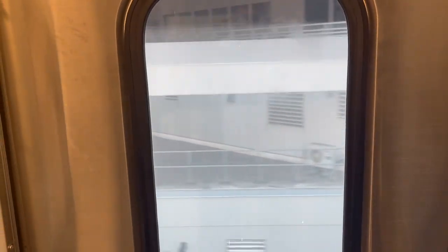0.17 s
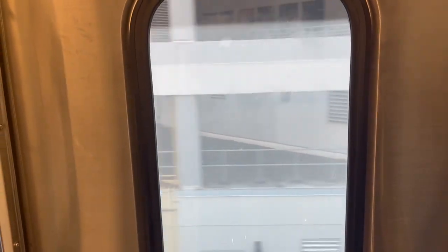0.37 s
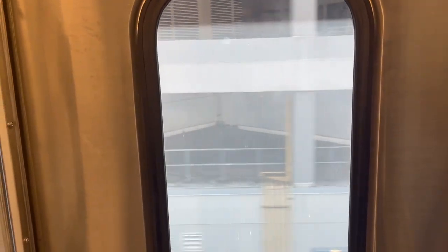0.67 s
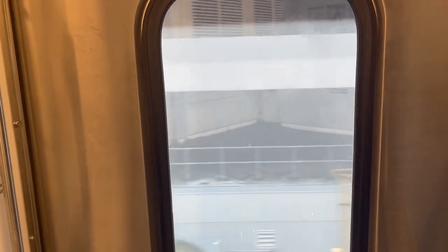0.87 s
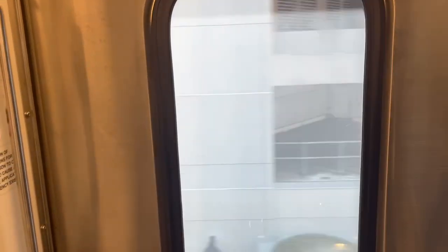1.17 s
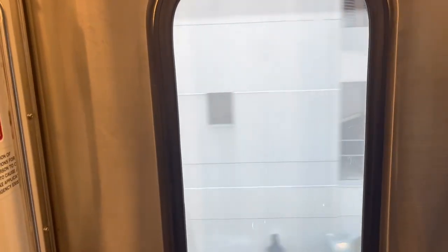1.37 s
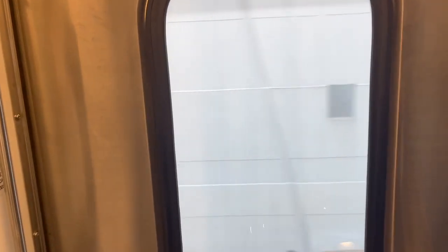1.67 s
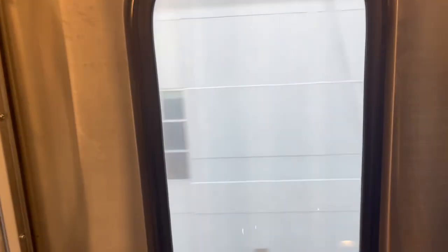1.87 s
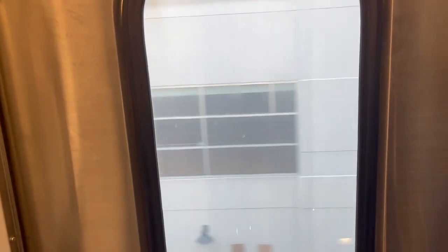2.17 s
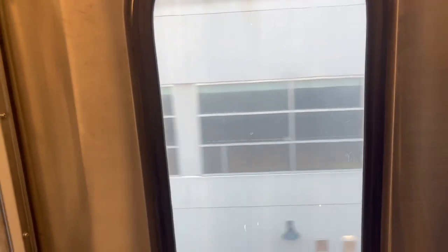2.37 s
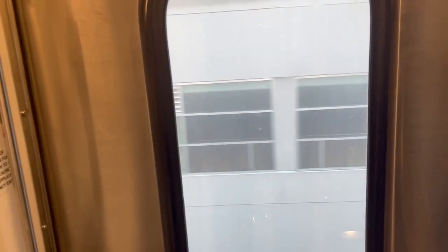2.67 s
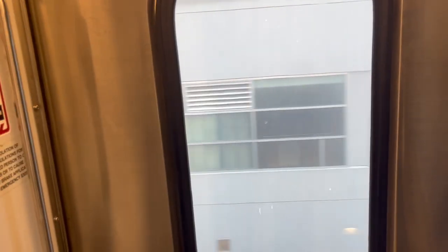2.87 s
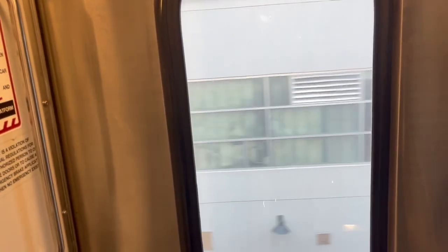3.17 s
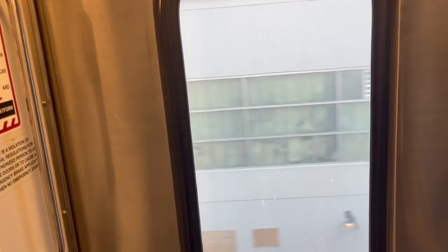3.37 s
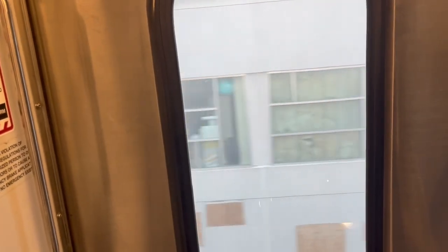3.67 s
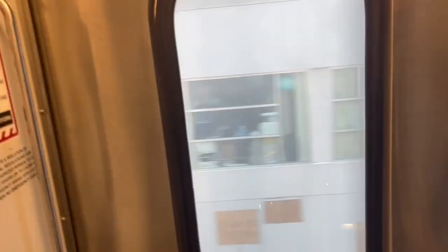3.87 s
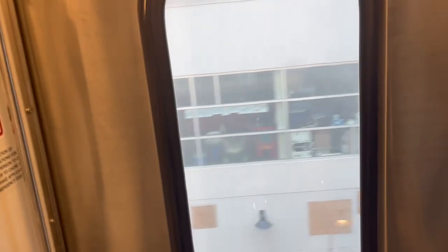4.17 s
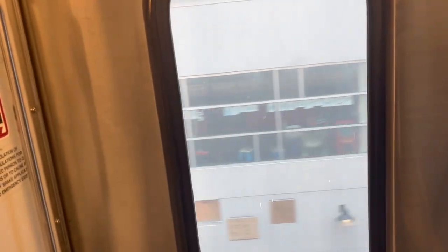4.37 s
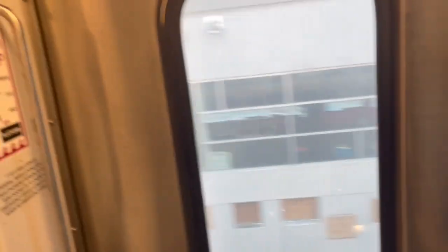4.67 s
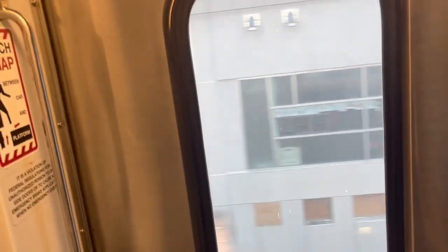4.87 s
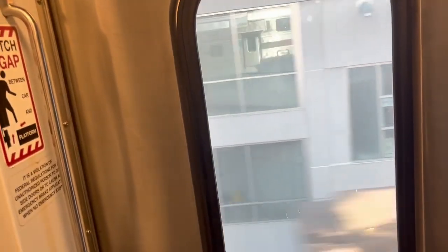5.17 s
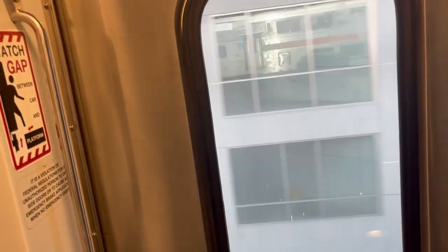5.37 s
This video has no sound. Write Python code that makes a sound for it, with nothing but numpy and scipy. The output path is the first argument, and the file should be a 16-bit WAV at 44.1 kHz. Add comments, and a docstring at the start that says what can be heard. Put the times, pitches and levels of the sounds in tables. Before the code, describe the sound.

Inside a rolling train coach, a burst of rushing air fades into low rumble, with dull rail knocks, a brief squeak and light ticks.

```python
"""Inside the vestibule of a slowly rolling train coach: the floor booms, the body drones and wheels roar as
shaped noise; a transformer, fans and drive train hum as unsteady tones and one narrow band of noise. A rush of
air, noise that rings door and walls, dies away at the start; draught fizzes in gusts at the door seal. Rail
joints knock, the body drone swells once, a loose panel ticks and two puffs of air hiss, all as decaying bands
of noise; a rubber seal squeaks in short slips of tone and friction noise. Two close microphone ports hear it."""
import sys
import numpy as np
from scipy import signal
from scipy.fft import rfft, irfft, next_fast_len
from scipy.io import wavfile
from scipy.ndimage import uniform_filter1d, map_coordinates

SR = 44100
rng = np.random.default_rng(int(sys.argv[2]) if len(sys.argv) > 2 else 0)


def undo_db(level):
    """Turn decibels back into plain size, where 20 dB means ten times bigger."""
    steps = np.asarray(level, float) / 20
    return 10 ** steps


def int16_out(signal):
    """Quantize to a 16-bit WAV file."""
    q = np.round(np.clip(np.atleast_2d(signal).T, -1, 1) * 32767)
    wavfile.write(sys.argv[1], SR, q.astype(np.int16))


N = 242991  # length in samples

# Likeness of the two ports. Each row: frequency in Hz, left-right correlation from 0 to 1.
PORT_LIKENESS = [(30, 0.98), (100, 1), (220, 0.66), (350, 0.92), (700, 0.28), (1300, 0.14), (1900, 0.33),
                 (3000, 0.56), (4500, 0.27), (6000, 0.23), (8000, 1), (12000, 0.86)]
# Phase between the ports. Each row: frequency in Hz, lead of the left port in radians.
PORT_LEAD = [(50, 0), (700, .6), (1100, .4), (1450, -2.7), (1700, -5.8), (3200, -5.3), (5000, -6.3),
             (6500, -7.3), (8300, -9.4), (9700, -10.6), (11200, -12.5), (12800, -12.7), (14200, -15.5)]
# Level between the ports. Each row: frequency in Hz, left over right in dB.
PORT_TILT = [(60, 0), (180, 0), (530, 1.5), (1560, 0), (4630, 3), (13700, -2.5)]

# Strength of the rolling over its mean. Each row: time in seconds, level in dB.
ROLLING_STRENGTH = [(0, 0.5), (.6, -1), (1.0, 1.5), (1.6, -1.5), (2.1, 1.5), (2.8, -.5), (3.7, 0),
                    (4.4, -0.5), (5.0, 0), (5.51, 0)]
# Level of the floor's boom. Each row: time in seconds, level in dB.
BOOM_LEVEL = [(0, -21), (.5, -24.5), (1.1, -20.5), (1.5, -24), (2.05, -22.5), (2.7, -23.5), (3.6, -24),
              (4.0, -24), (4.4, -23.5), (4.9, -25), (5.51, -22.5)]
# Noise spectra of boom, drone and roar. Each row: frequency in Hz, relative density in dB per Hz.
BOOM_SPECTRUM = [(10, -49), (18, -22.5), (30, -18.5), (38, -17), (45, -7), (52, -0.5), (62, -3), (73, 0),
                 (90, -1), (110, 0), (122, 2.5), (135, -8), (170, -16), (220, -50.5), (370, -120)]
DRONE_SPECTRUM = [(76, -41.5), (130, -7), (167, -8.5), (199, -8), (291, -7.5), (360, -13), (391, -9.5),
                  (416, -10.5), (800, -24.5), (1040, -57.5), (1760, -120)]
ROAR_SPECTRUM = [(400, -16), (650, -5), (960, -1.5), (1100, -2.5), (1450, -4.5), (1650, -8.5), (1900, -7),
                 (2200, -11.5), (3200, -15.5), (4300, -18), (5500, -22.5), (7000, -34), (9000, -46.5),
                 (15400, -120)]
# Modes of the floor, and of the coach body. Each row: frequency in Hz, width in Hz,
# level over the noise itself in dB.
FLOOR_MODES = [(69.5, 4.5, -2), (78, 4, 0.5), (99.8, 7.6, -3.5), (118.6, 5.4, 1.5)]
BODY_MODES = [(226.7, 6.6, -6), (265.3, 6, 7), (290.4, 7.8, 0), (324.6, 3, 9), (348, 6, 1)]
DRONE_DB, ROAR_DB = -32, -40.5  # mean levels
DRONE_FOLLOWS, ROAR_FOLLOWS = 1.9, 0.57  # dB per dB of rolling strength

# Steady hums. Each row: pitch in Hz, level in dB, width in Hz, phase wander in radians.
STEADY_HUMS = [(28.3, -44.5, 1.1, 1.3), (59.2, -29.5, 2.4, .25), (557.4, -52, 30, 1.5),
               (1703, -72, 17, 1.4), (1804, -62, 20, 1.4), (1928, -59, 26, 1.4), (1972, -59.5, 26, 1.4),
               (2055, -62.5, 32, 1.6), (3040, -70, 22, 1.4)]
# Random wander of a hum's level. Each row: pitch in Hz, depth in dB.
HUM_WANDER = [(60, -0.2), (400, 2.5), (2000, 3)]
# Swelling and fading of a hum, about four random knots a second. Each row: pitch in Hz, depth in dB.
HUM_SWELL = [(60, 1.6), (400, 0.4), (1700, 2.6)]
# Levels of the low fan hum, the high fan hum and the drive-train tone. Each row: time in seconds, level in dB.
FAN_LEVEL = [(0, -51), (1.1, -43.5), (1.7, -43.5), (2.1, -48.5), (2.5, -44), (3.2, -40.5), (3.7, -44),
             (4.4, -45), (5, -41.5), (5.51, -48)]
WHINE_LEVEL = [(0.6, -56), (1.4, -49), (2.4, -61), (3.1, -46.5), (3.5, -51), (4.4, -52.5), (4.65, -47.5),
               (4.85, -53), (5.15, -46), (5.51, -51)]
DRIVE_LEVEL = [(0, -45.5), (1.2, -44.5), (2.0, -45), (2.7, -42), (3.3, -48), (4.0, -38), (4.6, -47.5),
               (5.05, -38), (5.51, -43.5)]
FAN_HZ, FAN_WIDTH_HZ, FAN_RAD = 390.5, 3, .35  # low fan hum: pitch, width, phase wander
WHINE_HZ, WHINE_WIDTH_HZ = 965.3, 25  # high fan hum
DRIVE_HZ, SAG_HZ_PER_S = 206.5, 5.1  # pitch at the start, fall as the train slows

# Draught at the door seal. Each row: frequency in Hz, relative density in dB per Hz.
DRAUGHT_SPECTRUM = [(3000, -30), (5000, 3), (6500, 8.5), (8000, 2.5), (10000, 5), (12000, -0.5),
                    (13500, -2), (14500, -10.5), (15300, -120)]
# Strongest gusts. Each row: peak time in seconds, peak level in dB, length between 6 dB points in seconds.
GUSTS = [(0.345, -72, 0.029), (0.679, -67, 0.044), (0.943, -71.5, 0.25), (1.286, -73.5, 0.082),
         (1.419, -64.5, 0.035), (1.693, -67, 0.051), (2.122, -70, 0.027), (2.266, -65, 0.11),
         (2.642, -69, 0.089), (3.726, -66, 0.071), (4.622, -74, 0.073), (5.066, -70.5, 0.17)]
DRAUGHT_DB, DRAUGHT_UNDER_RUSH_DB = -67, 34.5  # resting level, further part that follows the rush

# Panel ticks, and at 0.775 s and 0.818 s two puffs of air. Each row: start in seconds, level in dB, # centre in
# Hz, spread in octaves, time to fall 60 dB in seconds.
TICKS_AND_PUFFS = [(.775, -51, 12800, .12, .04), (.818, -51.5, 13100, 0.13, 0.049),
                   (3.17, -54, 11100, 0.26, 0.023), (4.8878, -33, 4280, 0.2, .008),
                   (4.9175, -31, 6600, 0.13, 0.0075), (4.92, -40.5, 5800, 0.15, .02),
                   (4.9795, -35, 3870, .3, 0.013), (5.09, -45, 4200, 0.12, 0.041),
                   (5.097, -56.5, 12500, .15, 0.026), (5.437, -36.5, 3750, 0.15, .02)]
RUSTLE_DB, RUSTLE_S, RUSTLE_WIDTH_S = -48.5, 4.97, 0.082  # panel rustle: peak, its time, width

# Slips of the rubber seal. Each row: peak time in seconds, peak level in dB, pitch in Hz,
# time from peak to 6 dB down in seconds.
SEAL_SLIPS = [(4.347, -45.5, 2510, 0.01), (4.35, -50, 3150, 0.013), (4.395, -49, 3080, 0.0091),
              (4.414, -47.5, 3230, 0.018), (4.421, -37.5, 2230, 0.015), (4.432, -43, 1876, 0.0099),
              (4.455, -44, 2210, .01), (4.464, -36.5, 3194, 0.0088), (4.465, -37.5, 2830, 0.0068),
              (4.475, -38, 1870, 0.0088), (4.48, -41, 2106, 0.011), (4.503, -46.5, 3060, 0.017),
              (4.54, -50, 1980, 0.038), (4.375, -52, 2800, 0.033), (4.435, -51, 2940, 0.026),
              (4.505, -56, 2700, 0.022), (4.53, -54, 3190, 0.02)]
# Hiss of the rubber under the squeak. Each row: peak time in seconds, peak level in dB,
# time from peak to 6 dB down in seconds, centre in Hz, spread in octaves.
SEAL_DRAG = [(4.455, -45, .055, 2050, .13), (4.44, -49, .08, 3050, .12)]
SLIP_OCTAVES, RUB_DB = 0.074, -3  # spread of the friction noise, its level over the tone

# Rail joint knocks, and at 1.88 s near 150 Hz a low swell of the body drone. Each row: start in seconds, #
# level in dB, centre in Hz, spread in octaves, time to fall 60 dB in seconds.
KNOCKS_AND_SWELL = [(.48, -28.5, 490, 0.6, 0.33), (.72, -28, 412, 0.62, 0.19), (.82, -30, 316, 0.23, 0.22),
                    (1.04, -31.5, 310, .3, 0.36), (1.995, -31, 1050, 0.41, 0.24), (1.88, -26.5, 148, 0.22, .5),
                    (2.016, -16, 103, 0.3, 0.16), (2.16, -28, 288, .3, 0.37), (2.01, -22.5, 520, 0.31, 0.18),
                    (2.562, -25, 416, 0.34, 0.11), (3.668, -30, 940, 0.95, 0.3), (3.676, -45, 4970, 0.75, 0.23),
                    (4.8, -27, 433, 0.3, 0.17), (4.83, -29.5, 704, 0.85, .25), (4.75, -38, 1310, .4, .3),
                    (4.88, -36, 1510, 0.4, 0.39), (5.03, -31, 530, 0.46, 0.15),
                    (5.08, -35.5, 1460, 0.072, 0.23)]
# Wall modes that every row of the knock table rings, the low swell included. Each row: frequency in Hz, width
# in Hz, level over the blow in dB.
WALL_MODES = [(325, 17, 10), (399, 7.4, 10.5), (469, 30, 5), (565, 32, 5), (599, 30, 2.5)]

# Rush of air, which fades fast and leaves a slowly dying wake. Each row: time in seconds, level in dB.
RUSH_LEVEL = [(0, -22), (.06, -22.5), (.17, -23.5), (.24, -26.5), (.35, -30.5), (.45, -36), (.6, -41),
              (1.0, -45), (2.0, -51), (5.51, -110)]
# Spectrum of the rushing air. Each row: frequency in Hz, relative density in dB per Hz.
AIR_SPECTRUM = [(150, -7.5), (250, -4), (450, -5), (650, -10), (870, -7), (1300, -9.5), (1700, -8),
                (2200, -16), (2600, -12), (3300, -16), (4200, -19), (5000, -25.5), (7000, -39.5),
                (9000, -61), (15400, -120)]
# Door and wall modes that the air rings. Each row: frequency in Hz, width in Hz, level over the air in dB.
DOOR_MODES = [(1214, 32, -7.5), (1809, 22, 10), (2006, 25, -1), (2675, 46, -1), (3080, 31, 2),
              (3470, 15, -0.5)]
FIZZ_UNDER_RUSH_DB, FIZZ_HZ, FIZZ_OCTAVES = 35.5, 12800, .12  # level, centre, spread of the bright fizz


def unit(x):
    """Normalization: the signal is scaled to rms 1."""
    return x / np.sqrt(np.mean(x ** 2) + 1e-20)


def along(points, hz):
    """Interpolation of (Hz, value) points on a logarithmic frequency axis."""
    f, v = np.transpose(points)
    return np.interp(np.log(hz + 1), np.log(f + 1), v)


def curves(rows):
    """Linear interpolation in time: one value per sample for each column after the time."""
    s, *cols = np.transpose(rows)
    return [np.interp(np.arange(N) / SR, s, c) for c in cols]


def wobble(rate):
    """Slow random modulation: a smooth curve through normal draws, rate knots a second."""
    knots = rng.standard_normal(int(N * rate / SR) + 4)
    return map_coordinates(knots, [np.arange(N) * rate / SR])


def bell_db(peak_s, width_s):
    """Gaussian envelope in time, 6 dB down one width from its peak."""
    return -6 * ((np.arange(N) / SR - peak_s) / width_s) ** 2


def hump_db(hz, centre_hz, octaves):
    """Gaussian band on a logarithmic frequency axis, 3 dB down one spread from its centre."""
    return -3 * (np.log2((hz + 1) / centre_hz) / octaves) ** 2


def filtered(x, response):
    """Linear filtering: the spectrum is multiplied by a complex response of frequency."""
    m = next_fast_len(N + 8192)
    return irfft(rfft(x, m) * response(np.fft.rfftfreq(m, 1 / SR)), m)[..., :N]


def resonances(modes):
    """Modal superposition: causal second-order band-passes, alternating in sign, form one response."""
    def response(f):
        total = 0
        for k, (centre, width, db) in enumerate(modes):
            mode = 1j * f * width / (centre * centre - f * f + 1j * f * width)
            total = total + (-1) ** k * undo_db(db) * mode
        return total
    return response


def ringing(x, modes):
    """Forced resonance: noise together with the modes that it rings, at rms 1."""
    return unit(x + filtered(x, resonances(modes)))


def noise(shape_db, patchy_db):
    """Partly coherent stereo noise of rms 1, with random gain patches; shape_db(hz, s) sets its colour."""
    hz, s, z = signal.stft(rng.standard_normal((2, N)), SR, nperseg=512)
    field = uniform_filter1d(rng.standard_normal(z.shape[1:]), size=5, axis=0)
    field = uniform_filter1d(field, size=12, axis=1)
    gain = undo_db(patchy_db * unit(field) + shape_db(hz[:, None], s))
    pair = signal.istft(z * gain, SR, nperseg=512)[1][:, :N]

    def mid_side_weights(f):
        angle = np.arccos(np.clip(along(PORT_LIKENESS, f), -1, 1)) / 2
        return np.array([np.cos(angle), np.sin(angle)])

    mid, side = filtered(pair, mid_side_weights)
    return unit(np.array([mid + side, mid - side]))


def flat_noise(patchy_db):
    """Broadband excitation: noise of equal mean density at all frequencies."""
    return noise(lambda hz, s: 0, patchy_db)


def coloured(spectrum, patchy_db):
    """Spectral shaping: stereo noise with a fixed spectrum, at rms 1."""
    return unit(filtered(flat_noise(patchy_db), lambda hz: undo_db(along(spectrum, hz))))


def blows(events, attack):
    """Short events: each is a band of noise that rises within the attack time and decays exponentially."""
    white = flat_noise(patchy_db=0)
    out = np.zeros((2, N + SR))
    t = np.arange(SR // 4) / SR  # each blow lasts at most a quarter second
    hz = np.fft.rfftfreq(len(t), 1 / SR)
    for k, (s, db, centre_hz, octaves, t60) in enumerate(events):
        shape = undo_db(-60 * t / t60) * (1 - np.exp(-t / attack))
        piece = white[:, k * len(t):][:, :len(t)]
        band = irfft(rfft(piece) * undo_db(hump_db(hz, centre_hz, octaves)), len(t))
        level = undo_db(db) * np.sqrt(np.mean(shape ** 2))
        out[:, round(s * SR):][:, :len(t)] += level * unit(shape * band)
    return out[:, :N]


def rush_gain():
    """Decay of the passing air's strength, as an amplitude."""
    return undo_db(curves(RUSH_LEVEL)[0])


def floor_boom():
    """Forced vibration: the wheels shake the floor, whose modes ring in low noise."""
    level_db = curves(BOOM_LEVEL)[0] + 0.12 * wobble(16) + 0.68 * wobble(16)
    return undo_db(level_db) * ringing(coloured(BOOM_SPECTRUM, patchy_db=-0.3), FLOOR_MODES)


def body_drone(track_db, judder):
    """Structure-borne sound: rolling noise rings the modes of the coach body."""
    level_db = DRONE_DB + DRONE_FOLLOWS * track_db + 0.38 * judder
    return undo_db(level_db) * ringing(coloured(DRONE_SPECTRUM, patchy_db=1.43), BODY_MODES)


def wheel_roar(track_db, judder):
    """Rolling noise: broadband roar of the wheels outside, louder with the rolling strength."""
    level_db = ROAR_DB + ROAR_FOLLOWS * track_db + 0.099 * judder
    return undo_db(level_db) * coloured(ROAR_SPECTRUM, patchy_db=1.35)


def seal_draught(judder):
    """Turbulence in a narrow gap: draught fizzes in gusts at the door seal and follows the rush of air."""
    gusts = sum(undo_db(db + bell_db(s, length / 2)) for s, db, length in GUSTS)
    resting = undo_db(DRAUGHT_DB + 2.4 * wobble(7.7))
    flow = resting + gusts + undo_db(-DRAUGHT_UNDER_RUSH_DB) * rush_gain()
    flicker = undo_db(.7 * judder + 1.1 * wobble(25))
    return flow * flicker * coloured(DRAUGHT_SPECTRUM, patchy_db=2.0)


def rolling():
    """Common excitation: one track roughness shakes drone, roar and draught together, beside the boom."""
    track_db, = curves(ROLLING_STRENGTH)
    judder = wobble(12)
    return floor_boom() + body_drone(track_db, judder) + wheel_roar(track_db, judder) + seal_draught(judder)


def hums():
    """Phase and amplitude modulation: each hum is a tone that wanders as fast as its width and swells."""
    t = np.arange(N) / SR
    fan = (FAN_HZ, curves(FAN_LEVEL)[0], FAN_WIDTH_HZ, FAN_RAD)
    total = 0
    for hz, db, width, rad in STEADY_HUMS + [fan]:
        wander_db = along(HUM_WANDER, hz) * wobble(width)
        swell_db = along(HUM_SWELL, hz) * wobble(4.127)
        tone = np.sqrt(2) * np.sin(2 * np.pi * hz * t + rad * wobble(width))
        total = total + undo_db(db + wander_db + swell_db) * tone
    return total


def whine():
    """Narrow-band noise: its random envelope breaks the high fan hum into short rough flecks."""
    band = resonances([(WHINE_HZ, WHINE_WIDTH_HZ, 0)])
    flecks = unit(filtered(rng.standard_normal(N), lambda hz: band(hz) ** 2))
    return undo_db(curves(WHINE_LEVEL)[0]) * flecks


def drive():
    """Tone tied to rotation: the slightly unsteady drive-train pitch falls with the wheel speed."""
    pitch_hz = DRIVE_HZ - SAG_HZ_PER_S * np.arange(N) / SR
    level = undo_db(curves(DRIVE_LEVEL)[0] + 1.1 * wobble(2.7))
    phase = 2 * np.pi * np.cumsum(pitch_hz) / SR + 0.46 * wobble(5.2)
    return level * np.sqrt(2) * np.sin(phase)


def ticks_and_puffs():
    """Light impact: the loose panel gives short bright ticks on a soft rustle of noise; two faint puffs of air
    hiss near 13 kHz."""
    rustle = noise(lambda hz, s: hump_db(hz, 3800, .55), patchy_db=1)
    swell = undo_db(RUSTLE_DB + bell_db(RUSTLE_S, RUSTLE_WIDTH_S) + 2.2 * wobble(150))
    return blows(TICKS_AND_PUFFS, attack=.0003) + swell * rustle


def squeak():
    """Stick-slip friction: each slip of rubber sings a short wavering tone with a band of friction noise."""
    t = np.arange(N) / SR
    white = flat_noise(patchy_db=-0.5)
    rough = undo_db(2.5 * wobble(120)) * flat_noise(patchy_db=5.0)

    def band(source, centre_hz, octaves):
        return unit(filtered(source, lambda hz: undo_db(hump_db(hz, centre_hz, octaves))))

    total = 0
    for s, db, length, centre_hz, octaves in SEAL_DRAG:
        total = total + undo_db(db + bell_db(s, length)) * band(rough, centre_hz, octaves)
    for s, db, pitch_hz, length in SEAL_SLIPS:
        tone = np.sqrt(2) * np.sin(2 * np.pi * pitch_hz * t + 0.93 * wobble(90))
        friction = undo_db(RUB_DB) * band(white, pitch_hz, SLIP_OCTAVES)
        total = total + undo_db(db + bell_db(s, length)) * (tone + friction)
    return total


def knocks_and_swell():
    """Impulsive excitation: rail joints, softened in onset by the springs, strike dully and ring the walls; a
    low swell of the body drone rises and fades among them."""
    blow = blows(KNOCKS_AND_SWELL, attack=0.011)
    return blow + filtered(blow, resonances(WALL_MODES))


def rush():
    """Turbulent flow: air roars past the door, rings its modes and fades, with a bright fizz at the seal."""
    fizz = noise(lambda hz, s: hump_db(hz, FIZZ_HZ, FIZZ_OCTAVES), patchy_db=7.5)
    air = ringing(coloured(AIR_SPECTRUM, patchy_db=.6), DOOR_MODES) * undo_db(.4 * wobble(90))
    fizz_gain = undo_db(-FIZZ_UNDER_RUSH_DB + 1.1 * wobble(9.8))
    return rush_gain() * (air + fizz_gain * fizz)


def scene():
    """Superposition of all sources of the vestibule."""
    return rolling() + hums() + whine() + drive() + ticks_and_puffs() + squeak() + knocks_and_swell() + rush()


def top_cut(x):
    """Nothing passes above the cut-off."""
    return signal.sosfilt(signal.butter(12, 14340, fs=SR, output="sos"), x)


def record(dry):
    """Two-point reception: the ports differ in phase and level by frequency, half the difference at each."""
    def left(hz):
        return undo_db(along(PORT_TILT, hz) / 2) * np.exp(.5j * along(PORT_LEAD, hz))

    mix = filtered(dry, lambda hz: np.array([left(hz), 1 / left(hz)]))
    return top_cut(mix)


dry = scene()
out = record(dry)
int16_out(out)
```